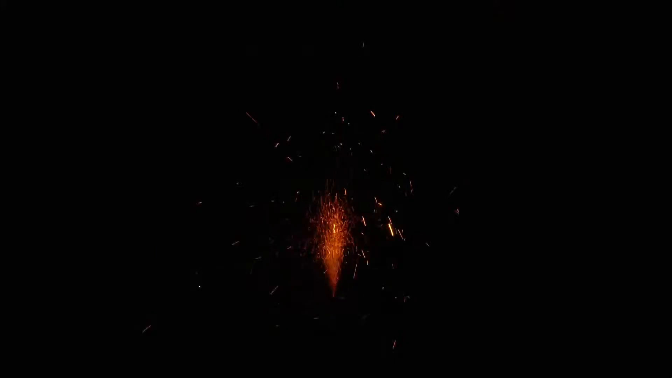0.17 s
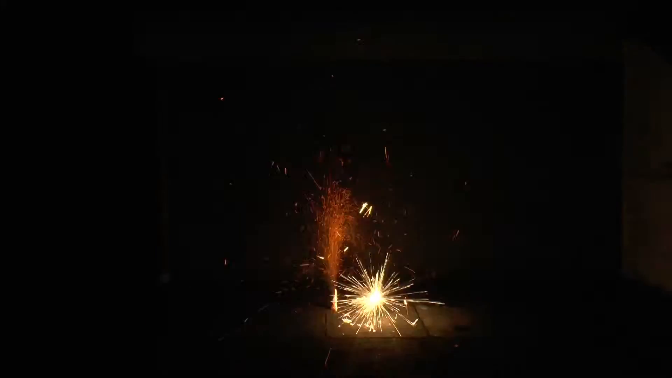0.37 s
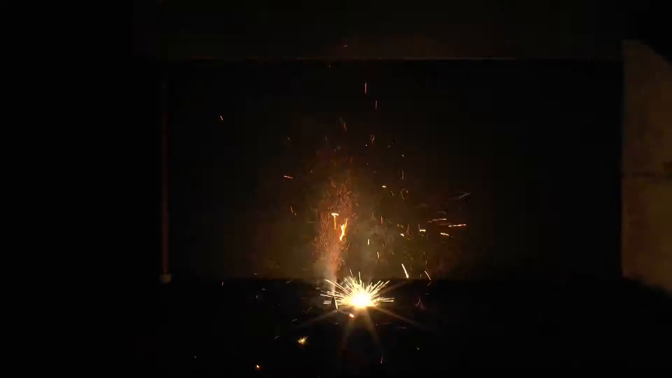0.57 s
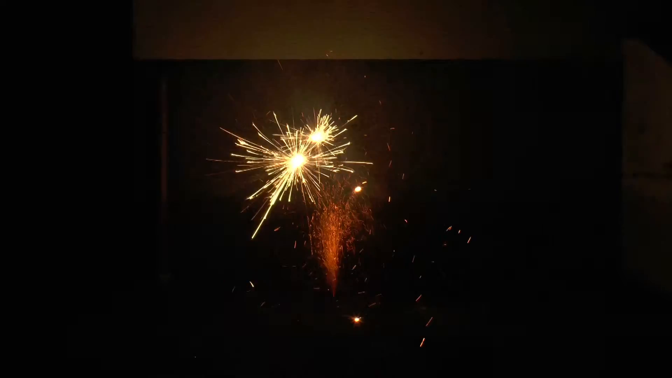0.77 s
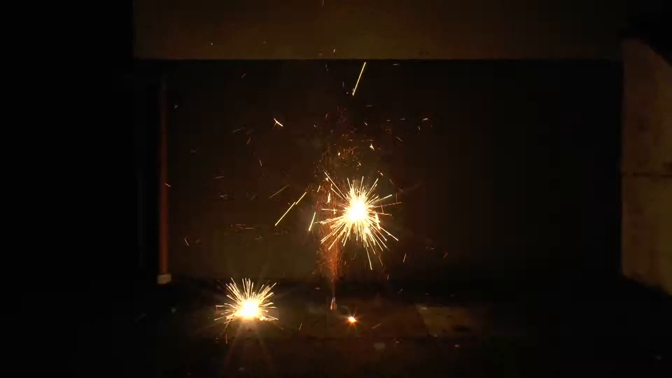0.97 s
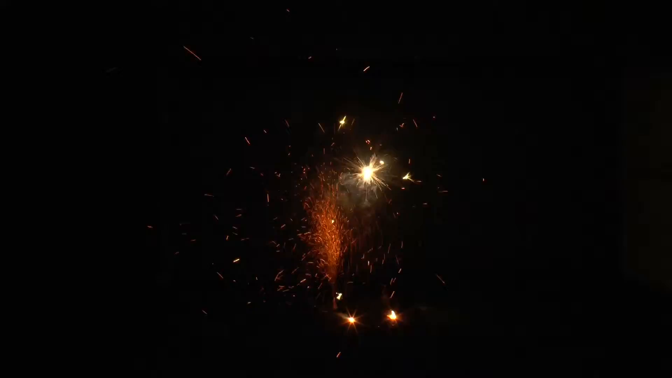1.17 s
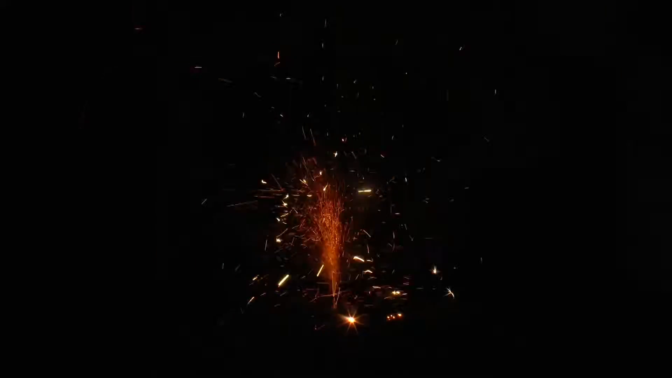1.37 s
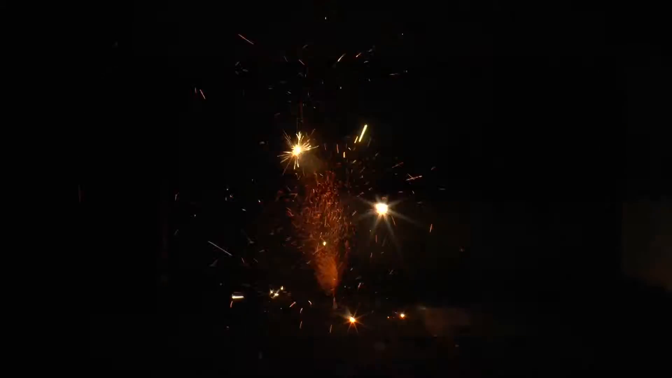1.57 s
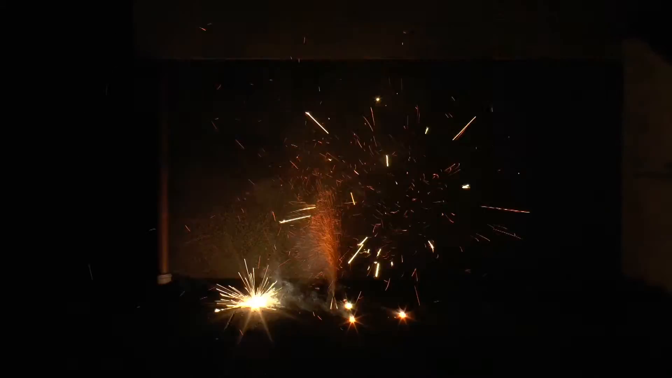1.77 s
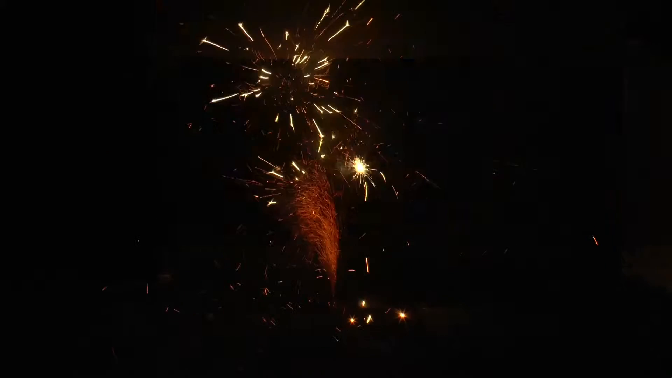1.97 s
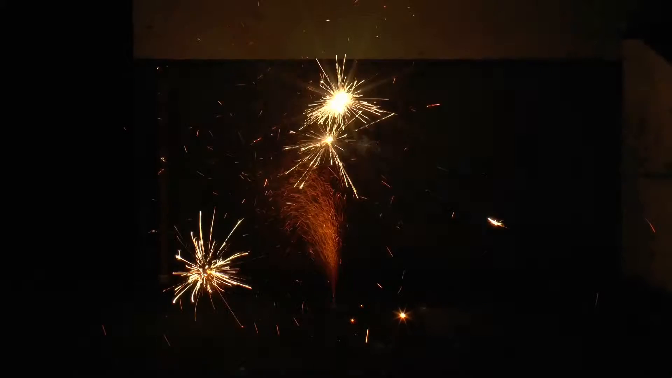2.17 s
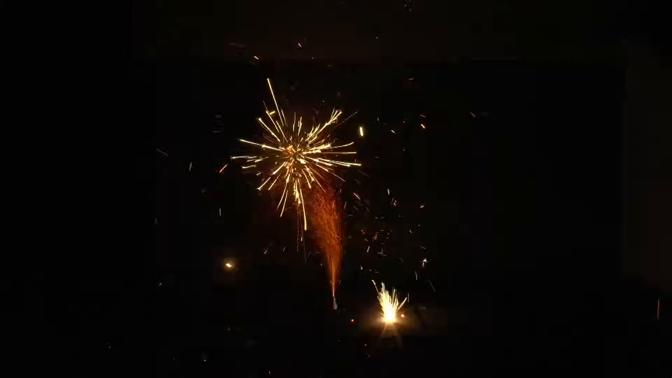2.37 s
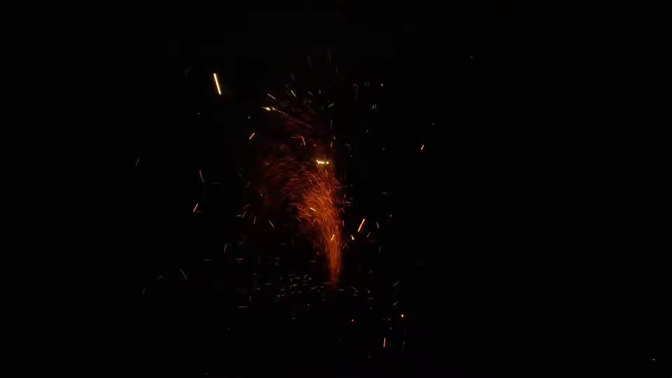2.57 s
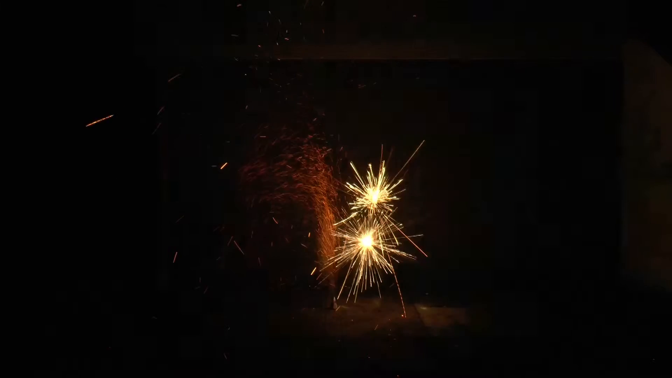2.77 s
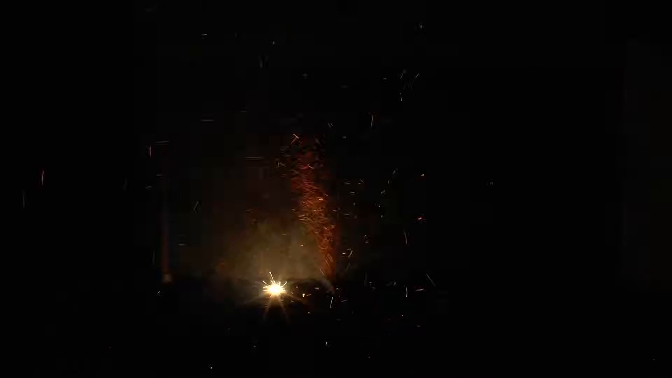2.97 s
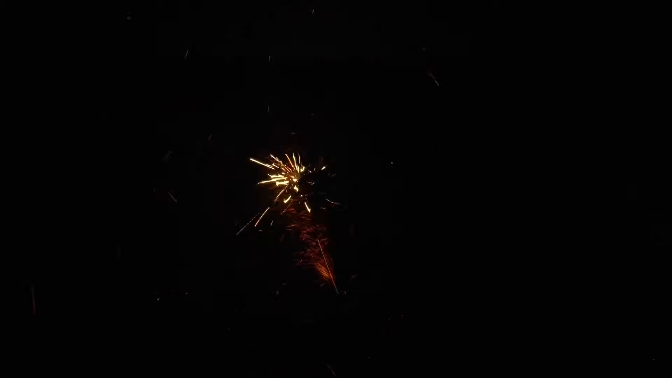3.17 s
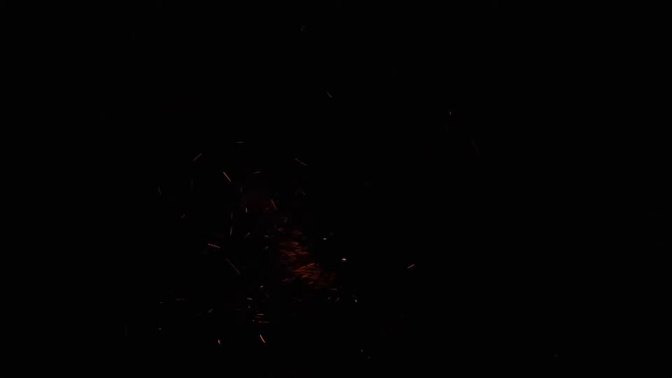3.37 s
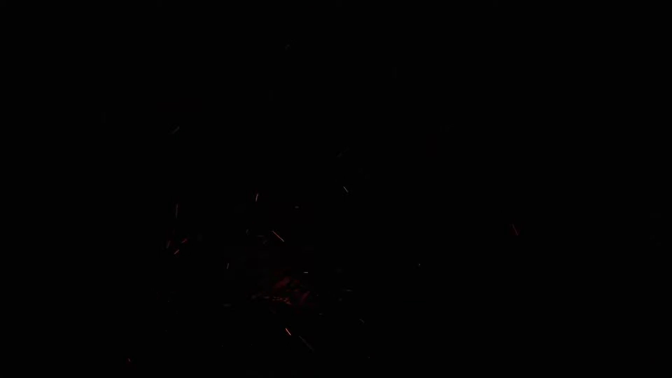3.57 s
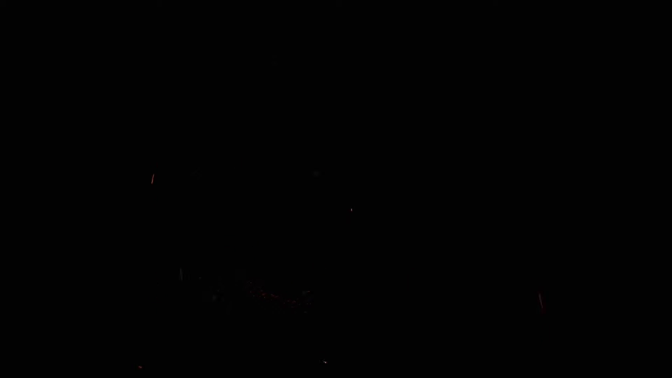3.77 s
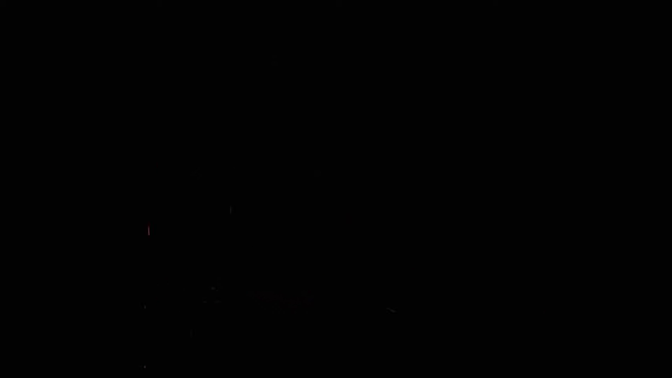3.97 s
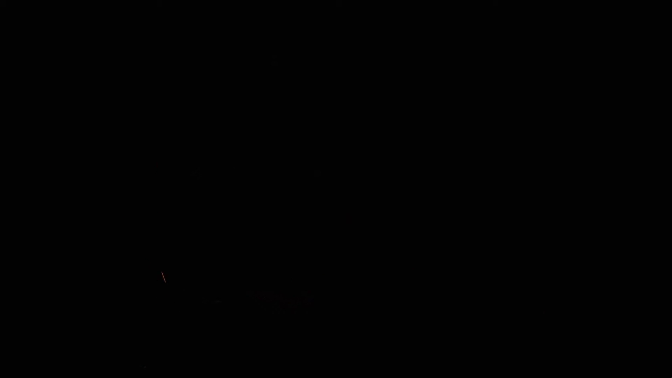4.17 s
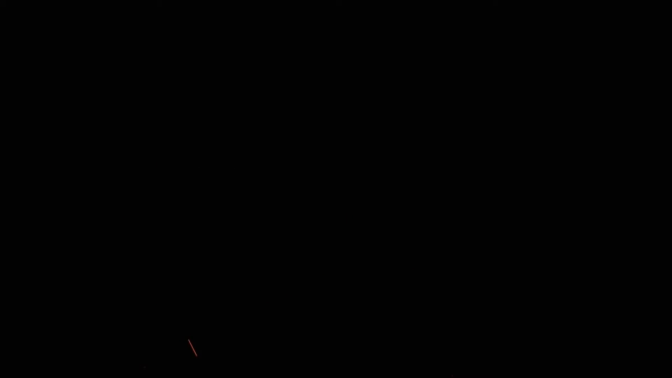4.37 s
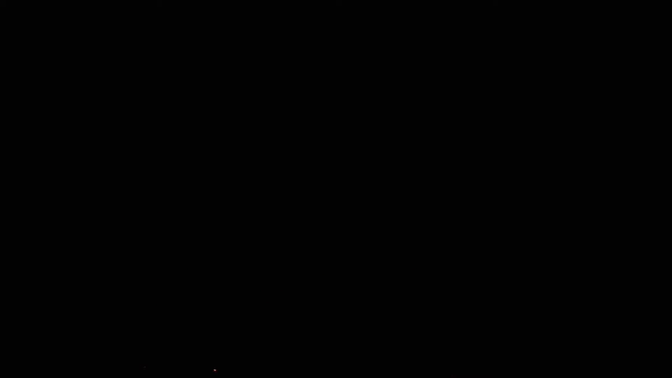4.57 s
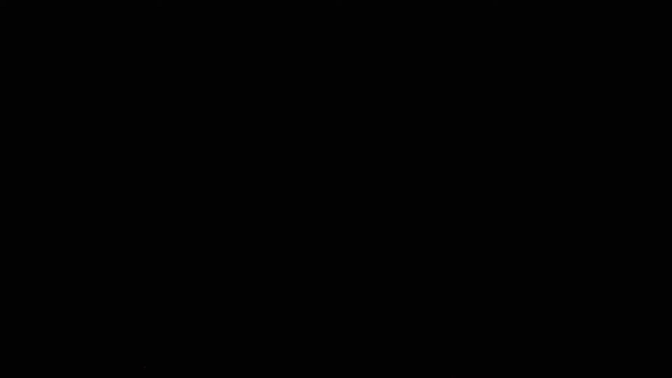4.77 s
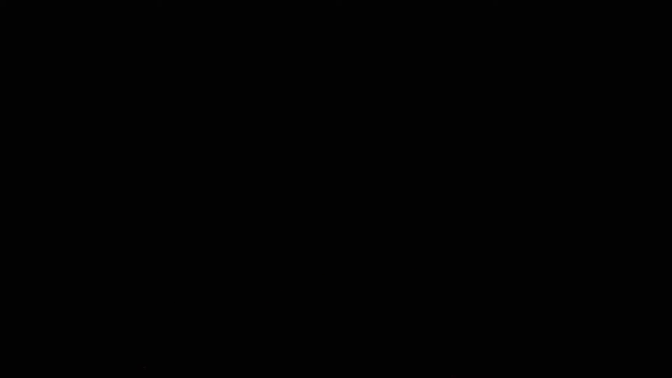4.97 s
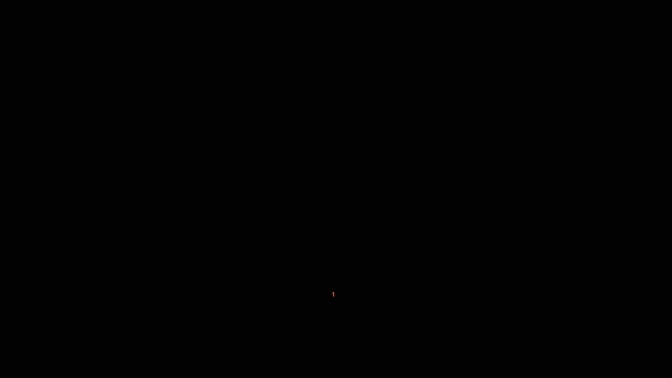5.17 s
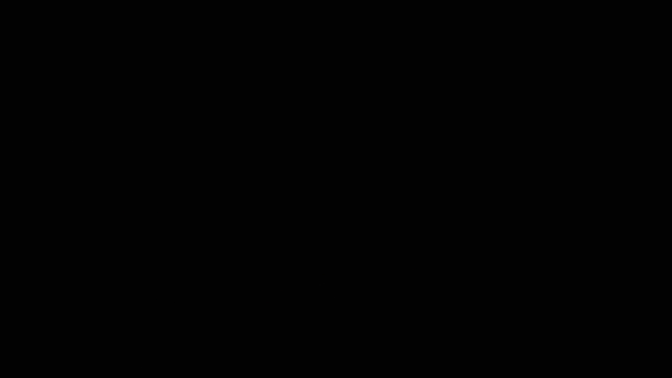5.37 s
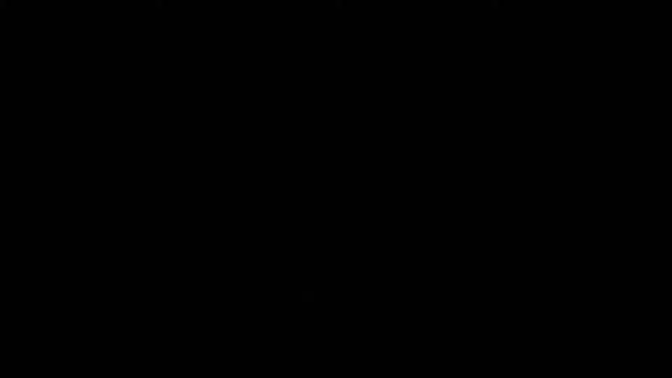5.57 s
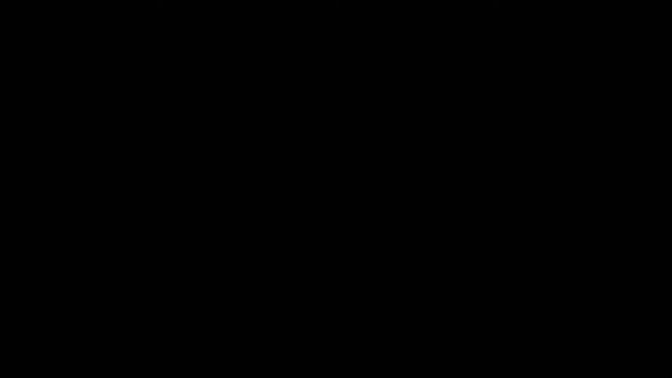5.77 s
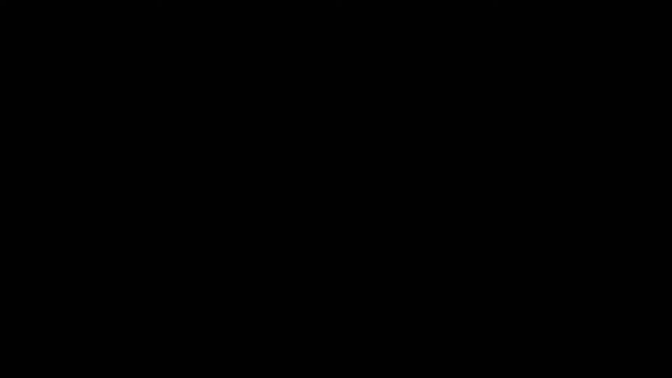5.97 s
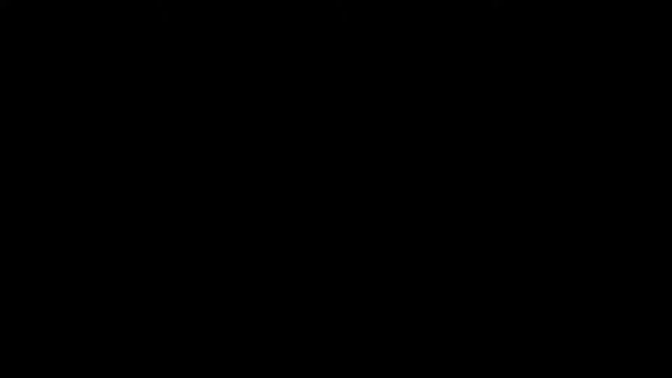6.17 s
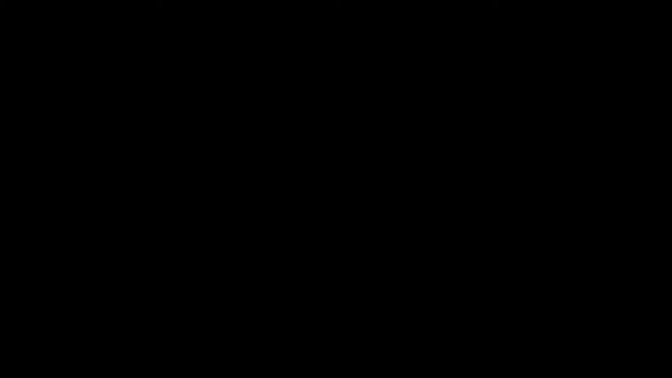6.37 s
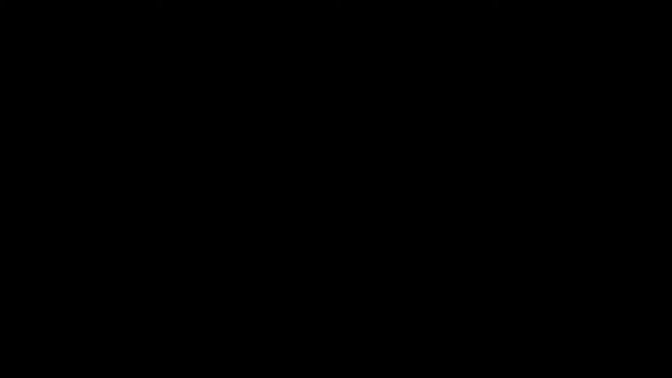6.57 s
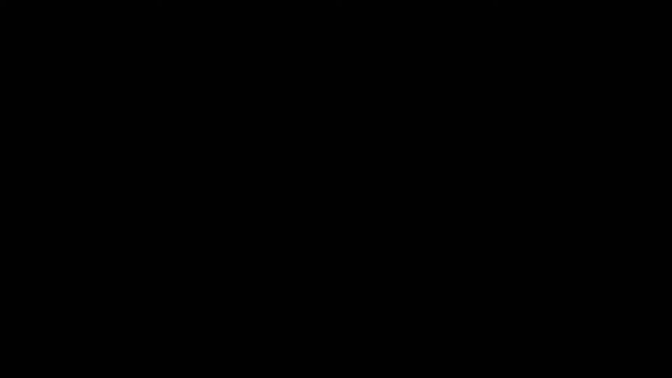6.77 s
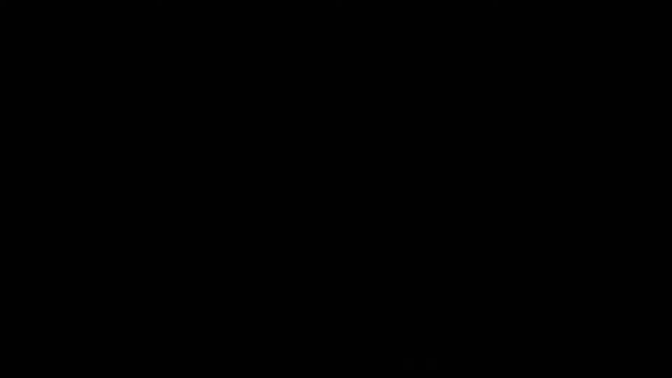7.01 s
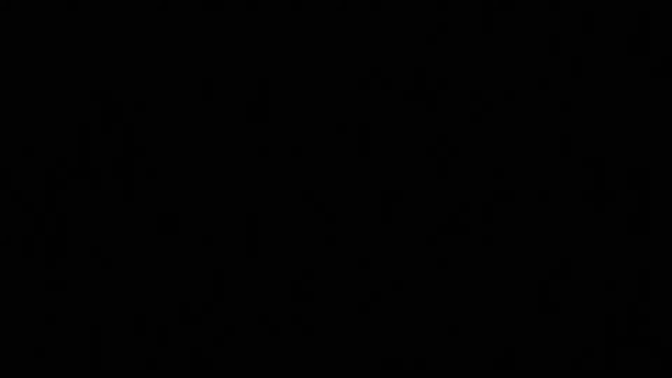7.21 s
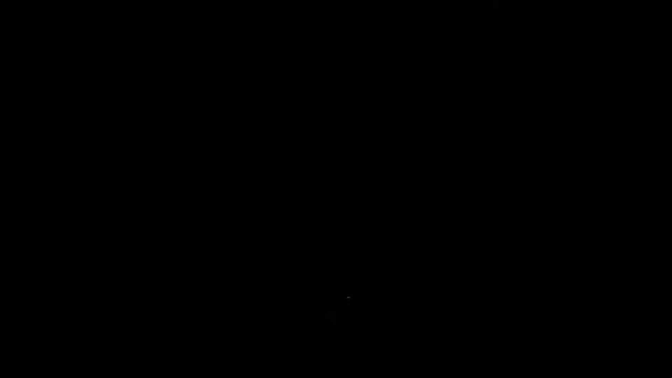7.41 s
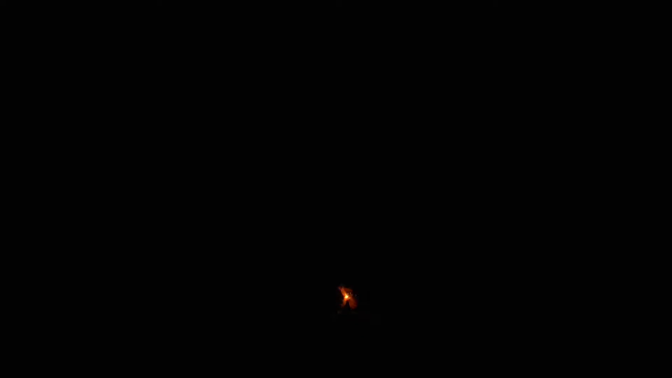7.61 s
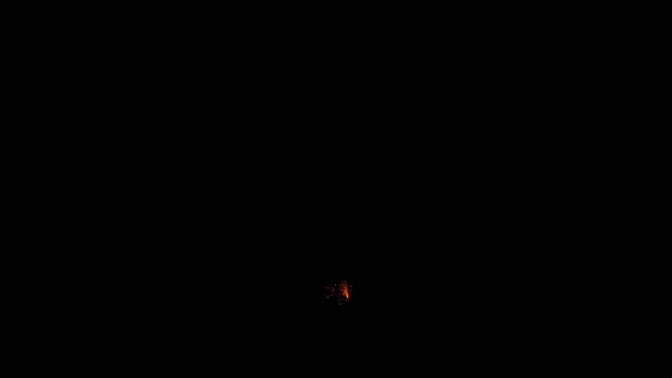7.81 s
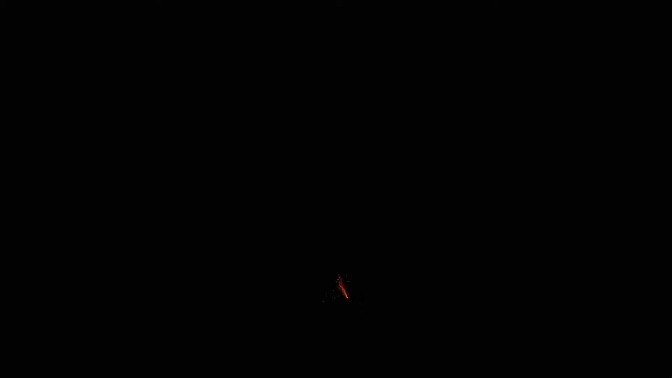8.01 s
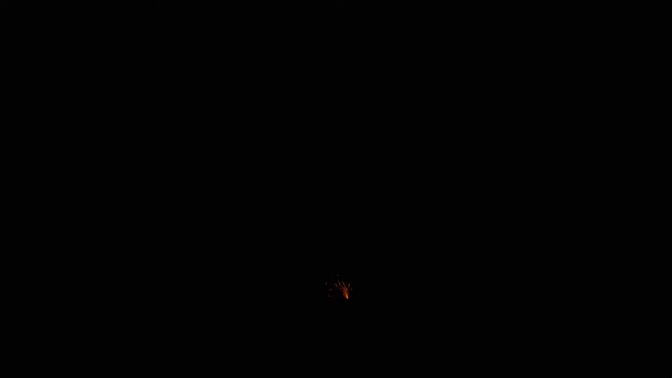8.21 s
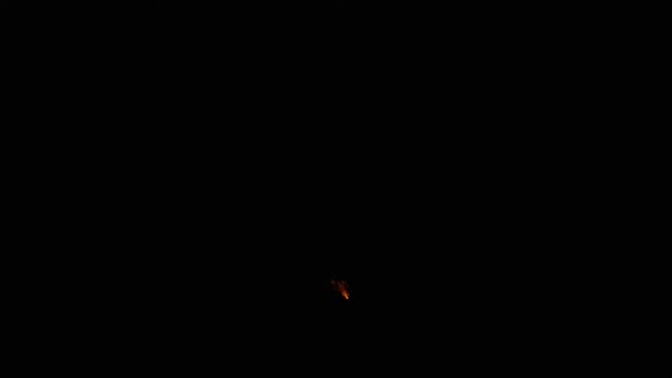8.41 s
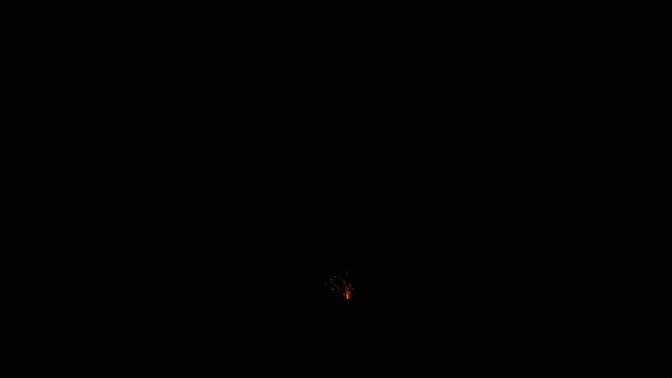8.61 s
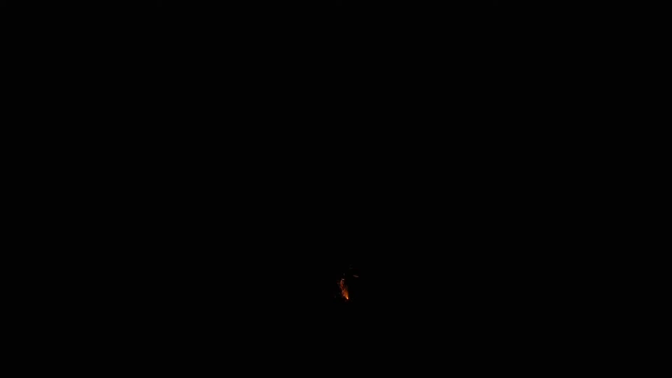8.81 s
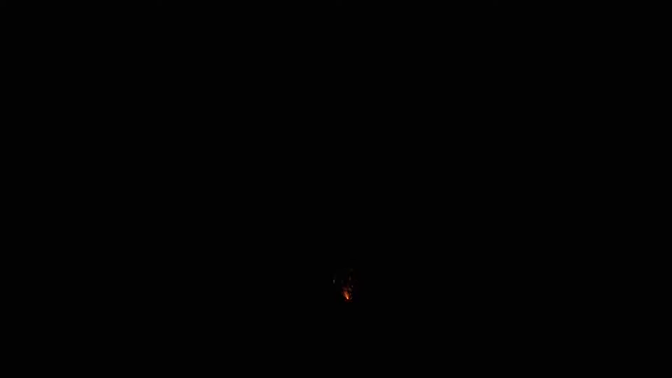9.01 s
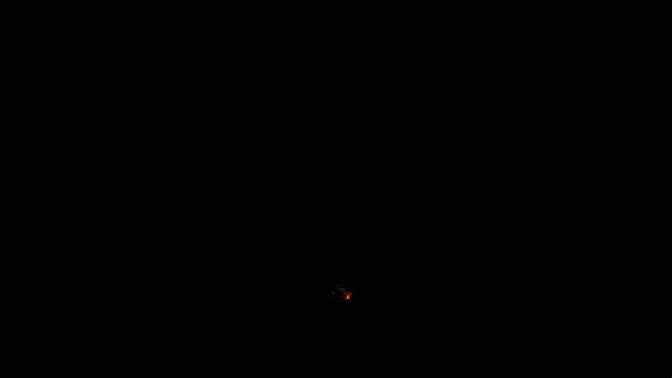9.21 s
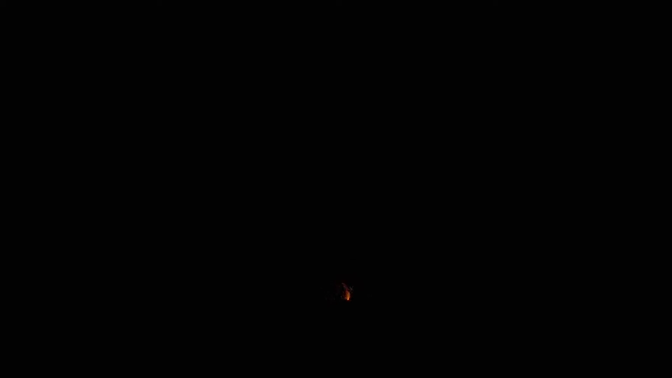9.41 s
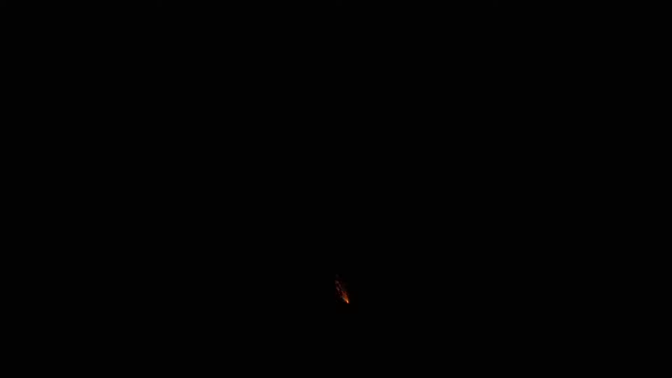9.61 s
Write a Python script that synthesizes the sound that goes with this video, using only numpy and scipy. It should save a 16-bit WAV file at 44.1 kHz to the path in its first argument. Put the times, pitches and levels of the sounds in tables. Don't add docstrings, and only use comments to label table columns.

```python
import sys
import numpy as np
from scipy import signal
from scipy.io import wavfile
from scipy.ndimage import uniform_filter1d

SR = 44100
rng = np.random.default_rng(int(sys.argv[2]) if len(sys.argv) > 2 else 0)


def boost_factor(decibels):
    exponent = np.asarray(decibels, float) / 20
    return 10 ** exponent


def transcribe(u):
    v = np.clip(np.atleast_2d(u).T, -1, 1)
    q = np.round(v * 32767).astype(np.int16)
    wavfile.write(sys.argv[1], SR, q)


N = 425563
CUT_S = 6.568

# burst in [s], crack in [dB], height in [m], # low push in [dB], sharpness in [Hz].
LAST_STARS = [(2.3367, -11.5, 0.73, -24, 4200), (2.391, -5.5, 1.5, -15, 2105),
              (2.419, -11.5, .1, -25.5, 4400), (2.4713, 0, 1.17, -15.5, 4200),
              (2.5399, -9.5, 1.6, -30, 3800), (2.72, -6.5, 2.1, -24, 5000),
              (2.7976, -9.5, 1.07, -31.5, 3800), (2.8356, -1, 0.69, -17, 4600),
              (2.891, -3.5, 0.63, -27.5, 3800), (2.9187, -10.5, 0.68, -41, 3800),
              (3.0197, -11, 1.5, -46, 5000), (3.1851, -6.5, 1.3, -30, 5100), (3.2803, -3, .9, -19.5, 3700),
              (3.4662, 0, 2.76, -13.5, 4100), (3.6824, -14.5, 0.11, -40, 4000)]
LAST_BURST_S = LAST_STARS[-1][0]


def power(db):
    return boost_factor(2 * db)


def evened(x):
    return x / np.sqrt(np.mean(x ** 2) + 1e-20)


def read(points, hz):
    f, value = np.transpose(points)
    return np.interp(np.log(hz + 1), np.log(f + 1), value)


def causal(db):
    log_gain = np.log(boost_factor(np.concatenate([db, db[-2:0:-1]])))
    return np.fft.ifft(np.exp(np.conj(signal.hilbert(log_gain)))).real[:2048]


def train(s, gain):
    out = np.zeros((2, N))
    at = np.round(np.asarray(s) * SR).astype(int)
    np.add.at(out, (slice(None), at), gain)
    return out


def bumps(events, t):
    return sum(power(db) * np.exp(-((t - s) / width) ** 2) for s, db, width in events)


def noise(spectrum, patchy_db, flicker_db, flicker_s):
    # frequency in [Hz], left-right likeness from 0 to 1.
    same_points = [(60, 0.84), (380, 0.89), (2380, 0.95), (15000, 0.99)]
    frames = N // 128 + 5
    hz = np.fft.rfftfreq(512, 1 / SR)
    a, b, c, d, patches = rng.standard_normal((frames, 257, 5)).T
    patches = uniform_filter1d(patches, size=6, axis=0)
    patches = evened(uniform_filter1d(patches, size=20, axis=1))
    smooth = np.exp(-128 / SR / flicker_s)
    flicker = evened(signal.filtfilt([1], [1, -smooth], rng.standard_normal(frames)))
    same = np.clip(read(same_points, hz), -1, 1)[:, None]
    left = a + 1j * b
    right = same * left + np.sqrt(1 - same ** 2) * (c + 1j * d)
    z = np.array([left, right])
    z *= boost_factor(read(spectrum, hz)[:, None] + patchy_db * patches + flicker_db * flicker)
    return evened(signal.istft(z, nperseg=512, noverlap=384)[1][:, :N])


def shock(hz, rise=0.28, fall=0.25, slowing=0.77):
    u = (np.arange(300) - 40) * hz / SR
    turns = np.where(u < 0, u, slowing * u)
    envelope = np.where(u < 0, np.exp(-(u / rise) ** 2), np.exp(-abs(u) / fall))
    return -np.cos(2 * np.pi * turns) * envelope


def pushes(burst_s, gain):
    u = np.arange(600) / SR / 0.00045
    push = 4 * u * (1 - u) * np.exp(-1.5 * u)
    hits = train(burst_s, gain)
    hits += 0.22 * np.roll(hits, round(0.0051 * SR), axis=1) + 0.23 * np.roll(hits, round(.009 * SR), axis=1)
    return signal.oaconvolve(hits, push[None])[:, :N]


def stars():
    # burst in [s], crack in [dB],
    # height in [m], low push in [dB], sharpness in [Hz].
    first_stars = [(.0103, -3.5, 1.68, -19, 4600), (0.0287, -5, 0.64, -22.5, 4900),
                   (.0627, -4, 1.04, -19.5, 2575), (.3412, -3.5, 0.35, -17.5, 3020),
                   (.3509, -5.5, 2.5, -23.5, 3000), (.4339, -1.5, 0.12, -12.5, 5660),
                   (0.4948, -13, 0.95, -24.5, 4560), (0.5469, -5.5, 0.67, -22, 4700),
                   (0.6276, -4.5, 2.96, -18.5, 4870), (0.6785, -5, 1.01, -29, 4420),
                   (0.801, -2, 1.43, -15.5, 4130), (0.8253, -7, 1.5, -41, 4200),
                   (0.9636, -5, 1.31, -23, 4100), (1.0207, -4.5, 0.81, -16.5, 5720),
                   (1.0327, -2.5, 0.09, -27.5, 5540), (1.0654, -4.5, 0.67, -22.5, 3400),
                   (1.104, -11, 0.77, -32.5, 3520)]
    full_stars = [(1.2373, -1, 1.4, -16.5, 4800), (1.281, -13, 1, -44.5, 4450),
                  (1.309, -18.5, 1.1, -50, 3490), (1.3266, -4, 1.67, -17, 4900),
                  (1.3599, -7.5, 1.27, -54.5, 4500), (1.5224, -13, 0.14, -38, 3700),
                  (1.5301, -5.5, 1.13, -18.5, 3700), (1.5538, -9.5, 2.2, -29.5, 3700),
                  (1.6146, -16.5, 0.14, -46.5, 3700), (1.6418, 0, 1.12, -14.5, 5000),
                  (1.7691, -3, 1.12, -19.5, 4500), (1.829, -8.5, 3.4, -19, 2900),
                  (1.8669, -2.5, 1.72, -23, 4300), (1.9597, -9.5, .1, -40.5, 4300),
                  (1.9764, -3, 2.3, -19, 4400), (2.0445, -2.5, 1.57, -17.5, 5400),
                  (2.1351, -4, 0.95, -36.5, 4700), (2.1987, -9, 0.085, -19, 2800),
                  (2.2133, -5, 1.76, -21.5, 5000), (2.2514, -4, 1.5, -24.5, 5100)]
    # lateness in [ms], more lateness per metre of height in [ms/m],
    # level in [dB], scatter from star to star in [ms].
    slaps = [
        (0, 0, 0, 0),
        (0, 1, -2.5, 0),
        (4.6, -.1, -2, .4),
        (4.7, .75, -2.5, .4),
        (5.8, .7, -6, .5),
        (8.5, .8, -4.5, .4),
        (16.2, -.6, -4, .4),
        (16.2, 0, -8, .5),
        (28, 0, -7, .5),
        (119.7, 0, -20, .5),
    ]
    # time in [s], peak in [dB].
    spits = [
        (7.8195, -23),
        (7.922, -19),
        (7.928, -21.5),
        (7.943, -24),
        (9.1453, -26),
    ]
    # frequency in [Hz], gain in [dB].
    crack_edge = [(30, 0), (90, 1.5), (600, 1), (3000, 0.67), (6500, 1), (11000, 4.5), (14500, -4.5),
                  (16500, -11)]
    crack_db, push_db, pan_db = 1.5, 10.0, 1.0
    scatter, ragged = 0.24, 0.2
    dulling, far_dulling = 2.1, .35
    shard_count, shard_ms, shard_db = 2, 8, -11

    burst_s, peak_db, height, burst_db, burst_hz = np.transpose(first_stars + full_stars + LAST_STARS)
    late_ms, per_m, loss_db, spread_ms = np.transpose(slaps)
    chance = rng.standard_normal((len(burst_s), 2, len(slaps)))
    late_ms = late_ms + per_m * height[:, None] + spread_ms * chance[:, 0]
    loss_db = loss_db + 1.5 * chance[:, 1] * (spread_ms > 0)
    shards = rng.exponential(1, (len(burst_s), shard_count))
    late_ms = np.hstack([late_ms, 2 + shard_ms * np.minimum(shards, 3)])
    loss_db = np.hstack([loss_db, np.full(shards.shape, shard_db)])

    spit_s, spit_db = np.transpose(spits)
    s = np.append(burst_s[:, None] + late_ms / 1000, spit_s)
    db = np.append(peak_db[:, None] + loss_db, spit_db)
    age = np.clip(np.append(late_ms / 1000, 1 + 0 * spit_s), 0, .03)
    own_hz = np.append(burst_hz[:, None] + 0 * late_ms, 4000 + 0 * spit_s)

    draws = rng.standard_normal((len(s), 102))
    sharp_hz = 1.21 * own_hz * np.exp(scatter * draws[:, 0] - dulling * age - far_dulling * (age >= .03))
    smear_decay = boost_factor(-60 * np.arange(100) / SR / 0.0033)
    smear = ragged * (1 + 10 * age[:, None]) * draws[:, 2:] * smear_decay
    smear[:, 0] = 1
    cracks = signal.fftconvolve(shock(sharp_hz[:, None]), smear, axes=1)
    cracks = signal.lfilter(*signal.butter(1, 200, "highpass", fs=SR), cracks)
    cracks /= abs(cracks).max(axis=1, keepdims=True)

    db = db - 55 * age
    opposed = np.array([[1], [-1]])
    gain = boost_factor(db + crack_db + pan_db / 2 * draws[:, 1] * opposed)
    out = np.zeros((2, N))
    for at, crack, sides in zip(np.round(s * SR).astype(int) - 40, cracks, gain.T):
        out[:, at:at + len(crack)] += sides[:, None] * crack
    out += pushes(burst_s, boost_factor(burst_db + push_db + 1.8 * chance[:, 0, 0] * opposed))
    tone = causal(read(crack_edge, np.fft.rfftfreq(4096, 1 / SR)))
    return signal.oaconvolve(out, tone[None])[:, :N]


def embers():
    # time in [s], peak in [dB], pitch in [Hz], slap loss factor, tick share.
    pops = [
        (2.033, -16, 2380, 0.74, 0.55),
        (3.118, -17.5, 1720, .7, .055),
        (5.242, -9.5, 1650, 0.59, 0.52),
        (8.699, -29, 3700, 1.5, .2),
        (8.702, -26, 2410, 2.24, .4),
        (9.5542, -23.5, 2250, 1.5, 0.36),
    ]
    # lateness in [s], level in [dB].
    pop_slaps = [
        (0, 9.5),
        (.0022, -6.5),
        (.0044, 7),
        (.006, -2),
        (.0082, -4),
        (0.0096, 0.5),
        (0.0138, -6.5),
        (0.016, -4),
        (.028, -12.5),
        (0.042, -33.5),
    ]
    out, t = np.zeros(N), np.arange(500) / SR
    late, slap_db = np.transpose(pop_slaps)
    for s, db, hz, loss, tick in pops:
        t60 = 0.0064 * (1600 / hz) ** 4
        attack = np.minimum(t * hz / 0.42, 1)
        ring = np.sin(2 * np.pi * hz * t) * boost_factor(-60 * t / t60) * attack * 0.75
        thud = np.sin(2 * np.pi * 550 * t) * np.sin(np.pi * np.minimum(t / .0036, 1)) ** 2
        ring += tick * (1700 / hz) ** 3 * 0.18 * thud
        ring[:270] += .6 * tick * shock(5000)[30:]
        gains = rng.choice([-1, 1], len(late)) * boost_factor(db + slap_db * loss)
        for at, gain in zip(s + late, gains):
            out[round(at * SR):][:500] += gain * ring
    return out


def reply(tail_db=-11, spread=0.4):
    # frequency in [Hz], decay time t60 in [s].
    tail_t60 = [(150, 0.16), (500, 0.37), (1200, 0.14), (2800, 0.59), (7000, 0.37), (14000, 0.3)]
    near_db, near_s = -5, .04
    a, b = rng.standard_normal((2, 2, SR // 2))
    opposed = np.array([[1], [-1]])
    a = a[:1] + spread * a[1:] * opposed
    b = b[:1] + spread * b[1:] * opposed
    near = a * boost_factor(-60 * np.arange(SR // 2) / SR / near_s)
    hz, t, z = signal.stft(b, SR, nperseg=256)
    z = z * boost_factor(-60 * t / read(tail_t60, hz)[:, None])
    tail = signal.istft(z, SR, nperseg=256)[1][:, :SR // 2]
    return boost_factor(near_db) * near / np.linalg.norm(near[0]) + boost_factor(tail_db) * tail / np.linalg.norm(tail[0])


def yard(x, cloud_db=-30, cloud_s=.385):
    turn = 2 * np.pi * 3.1 * np.arange(N) / SR
    out = x.copy()
    for k in range(3):
        share = np.sqrt(8 / 9) * np.cos(turn / 2 + k * np.pi / 3) ** 2
        out += signal.oaconvolve(x * share, reply(), axes=1)[:, :N]
    band = signal.butter(3, [1500, 4000], "bandpass", fs=SR)
    cloud = signal.lfilter(*band, rng.standard_normal(6500))
    cloud *= signal.windows.tukey(6500, .7) / np.linalg.norm(cloud)
    puff = signal.oaconvolve(x, cloud[None])[:, :N]
    return out + boost_factor(cloud_db) * np.roll(puff, round(cloud_s * SR), axis=1)


def burning(t):
    # time in [s], jet hiss in [dB].
    fire_levels = [(0, -47.5), (.75, -51), (1.7, -48.5), (2.3, -48.5), (2.65, -50), (3.1, -60), (3.65, -60),
                   (3.8, -89.5), (6.8, -68), (7.15, -56), (7.47, -60), (7.51, -43), (7.75, -42),
                   (8.2, -44.5), (8.35, -48.5), (8.41, -44), (9.0, -45), (9.65, -43.5)]
    # time in [s], level in [dB], half
    # width in [s].
    puffs = [(4.35, -70, .05), (4.67, -66, .04), (5.03, -65, .06), (5.65, -60, .03), (6.15, -61.5, 0.32),
             (8.08, -39, 0.062), (8.43, -45, 0.023), (8.67, -46.5, 0.088), (8.95, -44, .025),
             (9.17, -46.5, 0.083), (9.49, -46, 0.042)]
    # time in [s], level in [dB], half width in [s].
    flare = [
        (7.59, -33.5, .045),
    ]
    roar_db, relit_roar_db, rumble_db = 4.5, -1.54, 1.7
    first_burn = t < LAST_BURST_S
    fire = power(np.interp(t, *np.transpose(fire_levels))) + bumps(flare, t)
    relit_roar = power(relit_roar_db) * (fire > power(-48.5))
    roar = fire * np.where(first_burn, power(roar_db), relit_roar)
    rumble = first_burn * fire * power(rumble_db)
    return rumble, roar, fire + bumps(puffs, t)


def surroundings(t):
    # time in [s], level in [dB], half width in [s].
    gusts = [
        (3.95, -45, .1),
        (4.35, -42.5, 0.058),
        (5.05, -47.5, 0.062),
        (5.51, -44, 0.025),
        (5.85, -50, .07),
        (7.3, -52, 0.28),
        (8.1, -60, 0.1),
        (8.95, -52, 0.022),
    ]
    # time in [s], level in [dB], half width in [s].
    car = [
        (4.8, -51.5, 0.46),
    ]
    duck_db, recover_s = -6.5, 0.79
    first = t < CUT_S
    held = power(duck_db * np.clip(1 - (t - LAST_BURST_S) / recover_s, 0, 1))
    wind = held * power(np.where(first, -49, -50.5)) + bumps(gusts, t)
    traffic = held * (power(np.where(first, -52.5, -50)) + bumps(car, t))
    return wind, traffic, held ** 1.5 * power(-68)


def background():
    # frequency in [Hz], level in [dB per Hz].
    breeze_tone = [(20, -19.5), (80, -3.5), (170, -7.5), (280, -13.5), (500, -38.5), (1500, -93.5)]
    hum_tone = [(150, -2.5), (300, -3), (900, 4.5), (2100, 0.5), (2900, -9), (4500, -16), (8000, -62)]
    jet_tone = [(1200, -24), (2500, 1.5), (4000, 2), (7500, 2), (10500, -1), (13000, -7), (15500, -12)]
    t = np.arange(0, N + 64, 64) / SR
    rumble, roar, hiss = burning(t)
    wind, traffic, air = surroundings(t)
    powers = wind + rumble, traffic + roar, air + hiss
    wind, hum, jet = (np.interp(np.arange(N) / SR, t, np.sqrt(p)) for p in powers)
    breeze = wind * boost_factor(-1.5) * noise(breeze_tone, patchy_db=1.5, flicker_db=3.4, flicker_s=.01)
    rush = hum * boost_factor(1.5) * noise(hum_tone, patchy_db=1.5, flicker_db=.6, flicker_s=.01)
    rush += jet * boost_factor(.6) * noise(jet_tone, patchy_db=1.5, flicker_db=.9, flicker_s=.008)
    echoes = 0.25 * np.roll(rush, round(.00535 * SR), axis=1) + 0.12 * np.roll(rush, round(0.0025 * SR), axis=1)
    return signal.lfilter(*signal.butter(2, 50, "highpass", fs=SR), breeze) + rush + echoes


def scene():
    return yard(stars() + embers()) + background()


def roll_off(x):
    return signal.sosfilt(signal.butter(12, 16820, fs=SR, output="sos"), x)


def record(dry):
    # centre in [Hz], width in [Hz], gain in [dB].
    body = [(495, 100, -3.5), (645, 280, -3), (922, 150, -11), (1112, 170, -5.5), (1283, 170, -7.5),
            (1558, 73, -14.5), (8540, 700, -1.5)]
    fade_s = 1.
    hz = np.fft.rfftfreq(4096, 1 / SR)
    body_db = sum(db / (1 + (2 * (hz - f) / width) ** 2) for f, width, db in body)
    heard = signal.oaconvolve(dry, causal(body_db)[None])[:, :N]
    heard = signal.lfilter(*signal.butter(1, 25, "highpass", fs=SR), heard)
    heard = .95 * np.tanh(heard / .95)
    lowpass = signal.firwin(511, 16500, window=("kaiser", 9), fs=SR)
    heard = signal.oaconvolve(heard, lowpass[None], "same")
    fade = np.minimum(abs(np.arange(N) / SR - CUT_S) / fade_s, 1) ** 0.99
    return roll_off(fade * heard)


dry = scene()
out = record(dry)
transcribe(out)
```